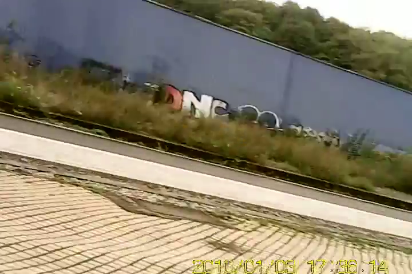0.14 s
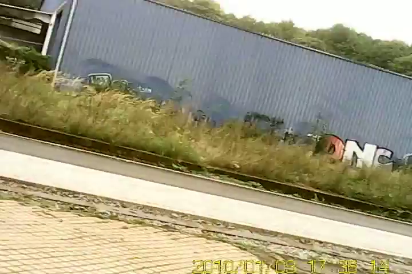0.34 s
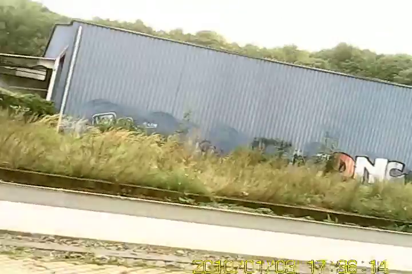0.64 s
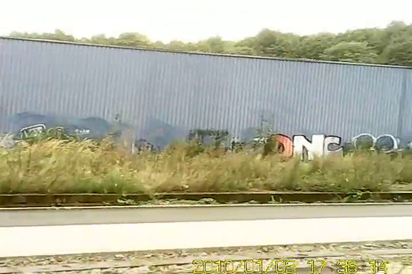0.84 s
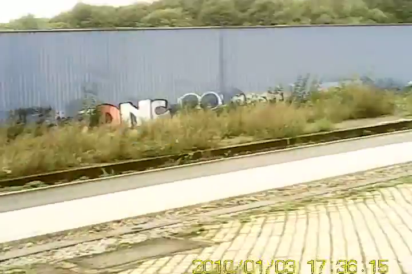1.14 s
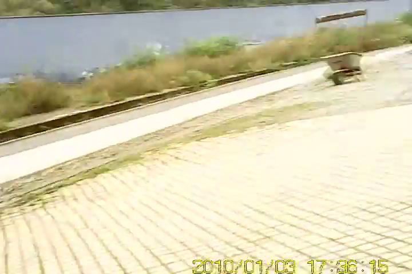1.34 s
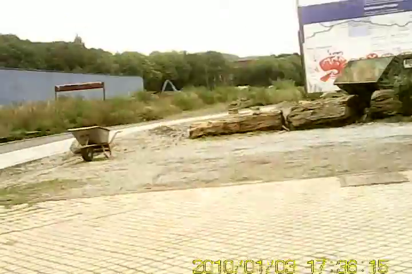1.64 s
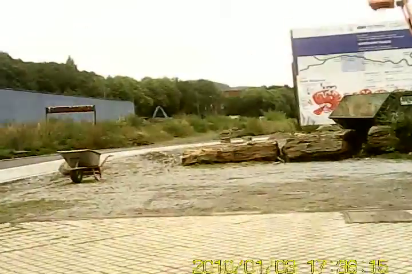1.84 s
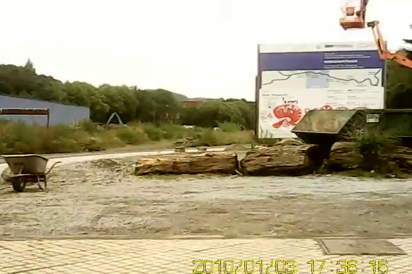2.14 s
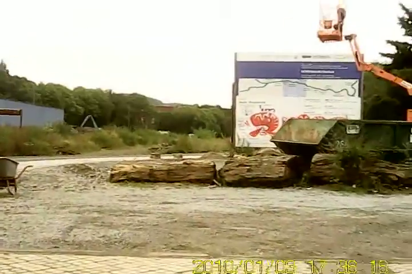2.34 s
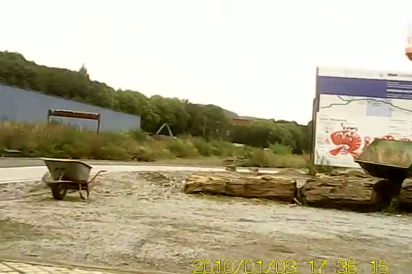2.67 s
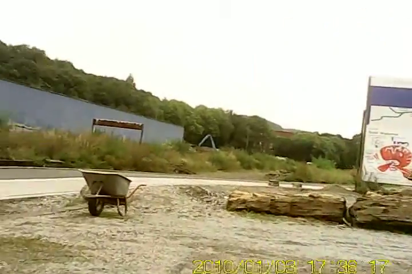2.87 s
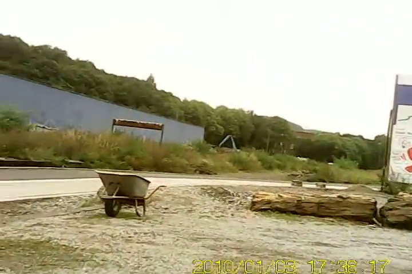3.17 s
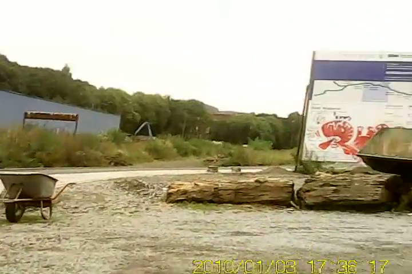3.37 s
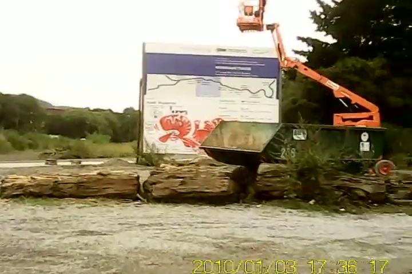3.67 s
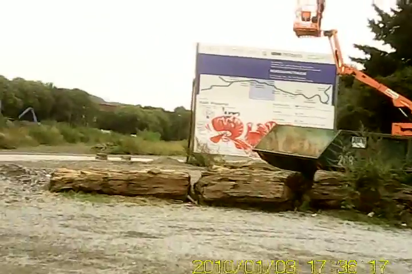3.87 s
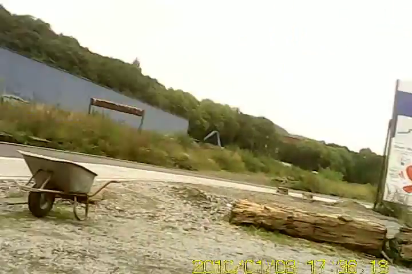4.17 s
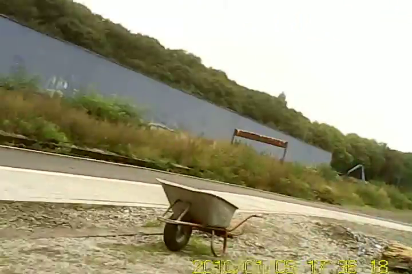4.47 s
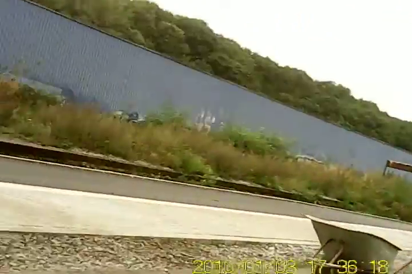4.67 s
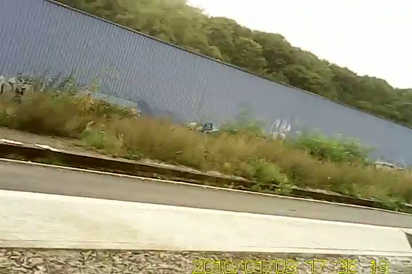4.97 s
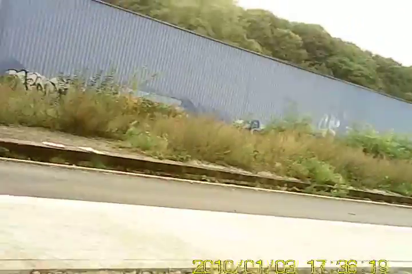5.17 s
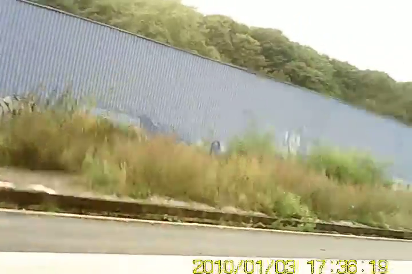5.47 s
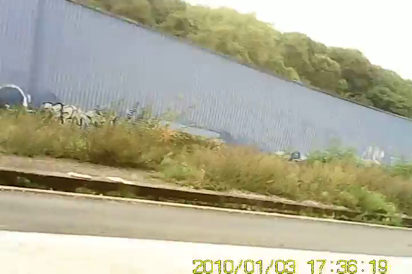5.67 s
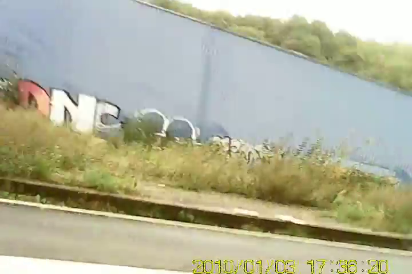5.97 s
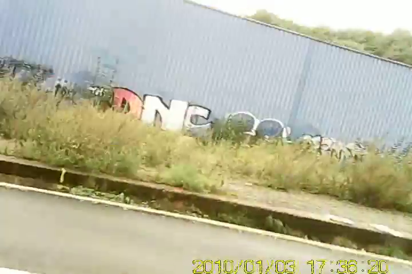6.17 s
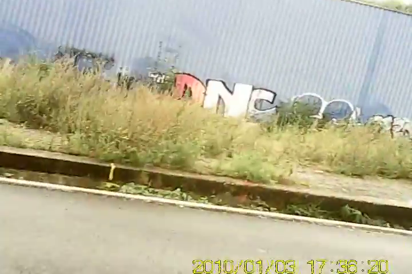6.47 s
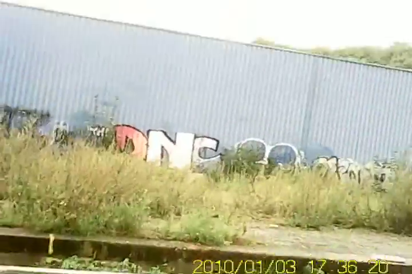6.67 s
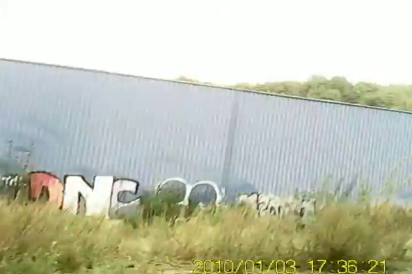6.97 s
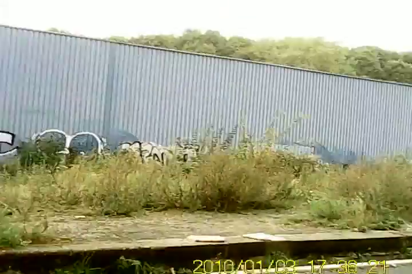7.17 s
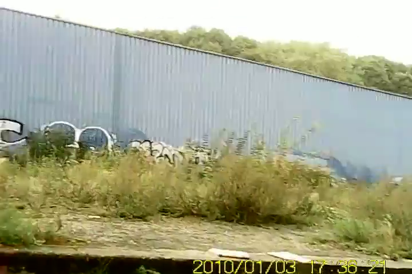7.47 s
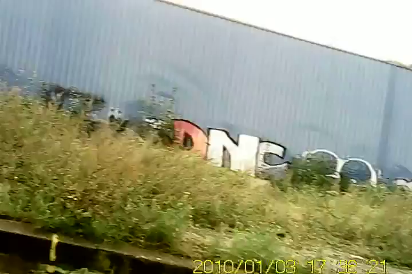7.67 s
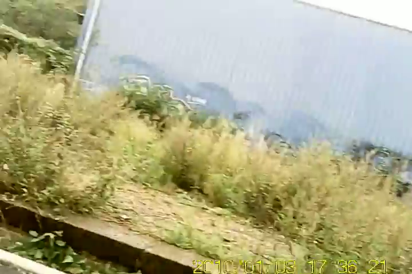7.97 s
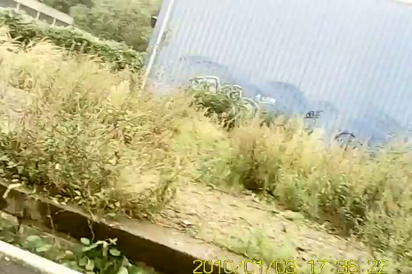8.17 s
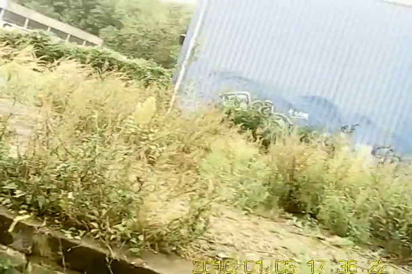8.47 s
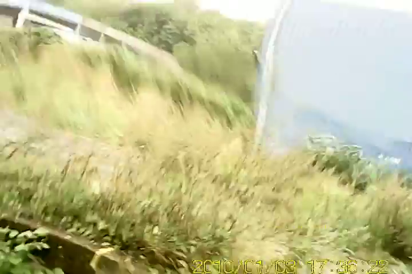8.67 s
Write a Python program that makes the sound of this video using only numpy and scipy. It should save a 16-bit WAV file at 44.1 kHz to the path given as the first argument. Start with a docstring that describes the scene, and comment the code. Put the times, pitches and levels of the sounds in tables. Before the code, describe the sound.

A bicycle rolls outdoors over uneven paving, gravel and a kerb, heard through a cheap microphone clamped to it: close, dry, boxy and badly clipped. A low, muffled midrange tyre rush runs throughout, with fine ticks and faint hiss. From 0 to 1.2 s sharp plastic clacks come in quick irregular groups; from 1.2 to 2.6 s they are lighter and sparser. A busy cluster of knocks with short metallic pings falls at 2.7-3.4 s, more at 3.7 s, then relative calm around 4-4.6 s. At about 5 s a longer buzzing rattle rings. From 5.45 to 7.3 s jolts merge into dense, violent chatter, with blunt overloaded pressure thumps around 6.4, 6.6 and 6.9 s. Separate knocks follow, a clear metallic ring at 7.65-7.75 s, harsh bursts at 8.0-8.3 s, a short lull, then hard rattling from 8.6 s to the end.

```python
"""Rattling camera on a bicycle

A small camera is clamped to a bicycle that rolls over paving, gravel and a kerb. Jolts make the mount chatter:
random contacts excite resonant modes of the case, and loose parts ring as decaying sines. Fine random ticks and
band-filtered noise for the tyre roar lie beneath. The converter rests just under its upper limit, so loud sounds
lose their upper half and crackle; a faint noise hiss is added."""
import sys
import numpy as np
from scipy import signal
from scipy.io import wavfile
from scipy.ndimage import uniform_filter1d

SR = 44100
rng = np.random.default_rng(int(sys.argv[2]) if len(sys.argv) > 2 else 0)


def pcm_store(signal):
    """Save signal as 16-bit PCM."""
    levels = np.round(np.clip(np.atleast_2d(signal), -1, 1) * 32767)
    wavfile.write(sys.argv[1], SR, levels.astype(np.int16).T)


N = 388962


def from_db(db):
    """Amplitude gain of a level in decibels."""
    return 10 ** (np.asarray(db) / 20)


def rms_one(x):
    """Signal scaled to rms 1."""
    return x / np.sqrt(np.mean(x ** 2) + 1e-20)


def drift(corner_hz):
    """Random modulation of rms 1: noise through a double one-pole low-pass."""
    pole = np.exp(-2 * np.pi * corner_hz / SR)
    noise = rng.standard_normal(N + SR)
    settled = signal.lfilter([1], [1, -2 * pole, pole * pole], noise)[SR:]
    return rms_one(settled)


def weak_jolts(tick_db):
    """Jolts at random moments, stronger on rougher ground; rows as for the strong jolts."""
    rate_per_s, mean_length_ms = 22, 6
    above_ticks_db, spread_db = 6, 3
    born = np.flatnonzero(rng.random(N) < rate_per_s / SR)
    length_ms = mean_length_ms * rng.exponential(1, N)[born]
    strength_db = (tick_db + above_ticks_db + spread_db * rng.standard_normal(N))[born]
    return list(zip(born / SR, length_ms, strength_db))


def chatter(weak):
    """A jolt is a first blow, then random contacts while the mount bounces; it also pumps the air in the case."""
    # strong jolts of the mount: (time [s], chatter length with last ring [ms], strength [dB])
    strong_jolts = [(.164, 2, -1), (.176, 15.7, -9), (0.226, 17.2, -9.5), (.348, 4.5, -10),
                    (.444, 4.13, -1.5), (0.455, 15, -16.5), (.478, 3.3, -16), (0.524, 2.2, 3),
                    (.534, 2.9, -3.5), (.557, 2.7, -4), (.57, 4.8, -8.5), (0.633, 4.7, -6),
                    (0.716, 1.1, -0.5), (0.858, 7.4, -13), (.88, 7.6, -11), (.924, 11.4, -24),
                    (.963, 12, -23), (1.019, 6.3, -4.5), (1.065, 2.2, -4.5), (1.099, 1.4, -12.5),
                    (1.131, 12.5, -5.5), (1.265, 2.2, -9.5), (1.408, 2.4, -14), (1.455, 2.7, -19),
                    (1.504, 1.2, -6.5), (1.586, 4.1, -20), (1.678, 7.1, -21.5), (1.703, 4.35, -5.5),
                    (1.759, 2.2, -10.5), (1.804, 2.7, -9), (1.812, 1.7, -11), (1.837, 3.9, -5.5),
                    (1.895, 4.6, -8), (1.954, 2.1, -7.5), (2.088, 1.7, -3.5), (2.109, 2.1, -15),
                    (2.214, 5.6, -19), (2.283, 2.7, -14.5), (2.639, 1.93, -11.5), (2.672, 2, -12),
                    (2.706, 3.1, -8), (2.736, 9.5, -19), (2.757, 9.3, -9), (2.774, 3.3, -2.5),
                    (2.8, 2.5, -10.5), (2.857, 3, -9.5), (2.898, 2.2, -2), (2.923, 8.7, -11.5),
                    (2.957, 3.6, -5), (2.972, 7.7, -13.5), (3.11, 2.43, 0), (3.118, 29, -8),
                    (3.157, 7, -2.5), (3.176, 1.4, -3), (3.189, 7.2, -7.5), (3.245, 2.7, -17.5),
                    (3.274, 1.74, -3.5), (3.289, 4.3, -11), (3.298, 3.3, -13), (3.367, 4.1, -15),
                    (3.42, 13.6, -21.5), (3.532, 3.7, -10), (3.546, 5.7, -18), (3.624, 5.6, -16),
                    (3.669, 2, -8.5), (3.678, 1.93, 1), (3.713, 2.2, -15), (3.779, 2.7, -9),
                    (3.924, 2.8, -9), (3.934, 6.1, -16), (3.973, 2.35, -10), (4.285, 4.16, -13),
                    (4.594, 3.4, -10.5), (4.616, 6.5, -16), (4.628, 9.6, -17.5), (4.637, 2.9, -8.5),
                    (4.677, 5.8, -11), (4.968, 46, -7.5), (4.694, 4.9, -15), (5.041, 6.6, -9.5),
                    (5.127, 1.8, -7.5), (5.214, 2.8, -8), (5.321, 2.4, -10.5), (5.331, 2.1, -5.5),
                    (5.341, 6.3, -15), (5.38, 4.2, -11), (5.396, 2.6, -8.5), (5.461, 2.5, -11),
                    (5.472, 4.8, -5), (5.487, 2.6, 1), (5.502, 25, -7.5), (5.552, 10.4, -10.5),
                    (5.628, 30, -9), (5.661, 15, -19), (5.685, 7.1, -8), (5.699, 15, -9), (5.726, 21, -8),
                    (5.776, 69, -29), (5.843, 19.7, -8.5), (5.875, 4.9, -11.5), (5.886, 7.9, -7),
                    (5.951, 3, -12), (5.962, 23, -10), (5.999, 32, -13.5), (6.032, 1.48, -0.5),
                    (6.05, 18.4, -8), (6.074, 4.4, -16), (6.105, 17, -13), (6.129, 2.55, -4.5),
                    (6.146, 6.5, -9.5), (6.16, 3.4, -8), (6.19, 9.9, -8.5), (6.202, 5.9, -7.5),
                    (6.217, 2.2, -3), (6.232, 21, -10.5), (6.284, 1.6, -14), (6.367, 2.6, -19),
                    (6.376, 35.5, -7), (6.416, 35.4, -5), (6.468, 28.5, -7), (6.503, 40.6, -9.5),
                    (6.564, 6.2, -11), (6.58, 52, -6), (6.636, 17, -7), (6.652, 17.6, -10),
                    (6.678, 15, -12), (6.709, 8.6, -6), (6.742, 2.9, -6.5), (6.754, 2.7, -9),
                    (6.773, 6.8, -9), (6.8, 10, -11), (6.841, 8.3, -6), (6.864, 30, -6.5),
                    (6.897, 41, -3.5), (6.944, 33, -8), (6.994, 6.1, -4), (7.006, 50, -6.5),
                    (7.051, 32.8, -7.5), (7.092, 30, -20.5), (7.127, 6.3, -5), (7.143, 18.7, -9),
                    (7.169, 40, -16.5), (7.202, 13.7, -5), (7.231, 4.4, -14), (7.278, 2.8, -6),
                    (7.283, 18, -20), (7.4, 5.1, -7), (7.427, 1.8, -5), (7.438, 17, -24), (7.461, 3.1, -14),
                    (7.481, 4.5, -8.5), (7.605, 3.2, -4), (7.63, 3.3, -18), (7.647, 15, -3),
                    (7.688, 2.9, -9), (7.726, 20.2, -6.5), (7.756, 19, -14), (7.814, 3.7, -13.5),
                    (7.893, 0.84, -5), (7.932, 1.86, -9), (7.96, 10, -11), (8.002, 2.6, -10),
                    (8.04, 46, -6), (8.1, 17, -6), (8.128, 1.7, -1), (8.149, 3.3, -16), (8.175, 41.5, -7.5),
                    (8.222, 18, -11), (8.247, 43, -8.5), (8.298, 9.3, -24), (8.621, 58, -9.5),
                    (8.689, 17, -3), (8.754, 20, -3), (8.79, 11.6, -11.5), (8.811, 9, -7)]
    first_blow_db = -7  # against the jolt
    last_ring_ms = 1.5
    bounce_hz, bounce_spread_db = 45, 2.5
    contacts_per_s, contact_spread_db = 1800, 2
    pump, pump_wobble, pump_wobble_hz = 0.4, 0.22, 326  # air pressure per unit of force

    force, blows = np.zeros(N), np.zeros(N)
    bounce_db = bounce_spread_db * drift(bounce_hz)
    for start_s, length_ms, strength_db in [*weak, *strong_jolts]:
        at = round(start_s * SR)
        bouncing_ms = max(length_ms - last_ring_ms, 0.)
        span = slice(at, at + round(bouncing_ms * SR / 1000) + 1)
        swell_db = bounce_db[span] - bounce_db[span].mean()
        force[span] = from_db(strength_db + swell_db)
        blows[at] = from_db(strength_db + first_blow_db)

    touching = rng.random(N) < contacts_per_s / SR
    contacts = touching * from_db(contact_spread_db * rng.standard_normal(N) - 4.5)
    smooth_force = uniform_filter1d(force, size=60)
    pumped = smooth_force * (pump + pump_wobble * drift(pump_wobble_hz))
    return force * contacts, blows, pumped, force


def case_rings(contacts, blows):
    """Contacts strike each mode with its own random strength and sign; a square blow starts all in step."""
    # modes of case and mount: (frequency [Hz], relative level [dB], t60 [s])
    modes = [(870, -33, 0.003), (1554, -10, 0.031), (1936, -5.5, 0.0069), (2258, 2, 0.0096),
             (2492, -3, 0.019), (2751, 2, 0.011), (2976, 3.5, 0.0087), (5160, 14, 0.0023)]
    strength_spread_db = 3
    out = np.zeros(N)
    for hz, level_db, t60_s in modes:
        pole = from_db(-60 / (t60_s * SR))
        w = 2 * np.pi * hz / SR
        strength = from_db(level_db + strength_spread_db * rng.standard_normal(N))
        struck = strength * contacts * rng.choice([-1, 1], N) - from_db(level_db) * blows
        out += signal.lfilter([0, np.sin(w)], [1, -2 * pole * np.cos(w), pole * pole], struck + 1e-18)
    return out


def faint_pings(tick_db):
    """Faint rings around one pitch at random moments, stronger on rougher ground; rows as for the clear rings."""
    rate_per_s, centre_hz, spread_hz = 14, 2363, 90
    above_ticks_db, spread_db = 12, 3
    born = np.flatnonzero(rng.random(N) < rate_per_s / SR)
    hz = centre_hz + spread_hz * rng.standard_normal(N)[born]
    level_db = (tick_db + above_ticks_db + spread_db * rng.standard_normal(N))[born]
    return list(zip(born / SR, hz, level_db))


def pings(faint):
    """A shaken metal part swells for a few cycles and rings out on one pitch with a rough buzz."""
    # clear rings of loose parts: (time [s], pitch [Hz], peak level before roughness [dB])
    clear_rings = [(0.227, 2600, -3), (0.232, 1552, -5.5), (0.92, 2185, -5), (1.131, 2967, -5),
                   (1.135, 1484, -6.5), (1.501, 2203, -4), (3.121, 1504, -2.5), (3.163, 1544, -6.5),
                   (3.241, 2410, -7), (3.921, 2195, -5.5), (4.963, 2730, -2), (4.97, 1527, -7),
                   (4.999, 2450, -5), (5.007, 1510, -9), (5.555, 1510, -7.5), (5.7, 1674, -3),
                   (5.731, 1617, -2), (6.05, 2970, -1), (6.144, 2270, -3.5), (7.043, 1528, -2),
                   (7.065, 1560, -7), (7.155, 2630, -10), (7.6, 2350, -7), (7.654, 1526, 1.5),
                   (7.728, 1486, -8), (7.732, 2300, 2), (7.755, 2930, -4), (7.958, 2314, -6),
                   (8.108, 2740, -8)]
    rise_s, t60_at_1500hz_s = 0.0023, 0.052
    rough_db, rough_hz = 3, 230
    out = np.zeros(N)
    t = np.arange(round(.08 * SR)) / SR
    phases = rng.uniform(0, 2 * np.pi, 1000)
    for (start_s, hz, peak_db), phase in zip([*clear_rings, *faint], phases):
        at = round(start_s * SR)
        decay = from_db(-60 * t / t60_at_1500hz_s * (hz / 1500) ** 1.6)  # higher rings die sooner
        shape = (1 - np.exp(-t / rise_s)) * decay
        ring = from_db(peak_db) * shape / shape.max() * np.sin(2 * np.pi * hz * t + phase)
        out[at:at + len(t)] += ring[:N - at]
    return out * from_db(rough_db * drift(rough_hz))


def shoves():
    """Each shove is one rounded push of pressure on the diaphragm, strong enough to pin the converter."""
    # pressure shoves: (time [s], length [ms])
    pushes = [(6.387, 8.2), (6.398, 7.7), (6.585, 4), (6.595, 5.2), (6.614, 4.8), (6.847, 9.9),
              (6.861, 2.2), (6.888, 5.5), (6.924, 4.6), (6.935, 5), (7.001, 5.1), (8.091, 9.1), (8.272, 6)]
    out = np.zeros(N)
    for start_s, length_ms in pushes:
        at, size = round(start_s * SR), round(length_ms * SR / 1000)
        out[at:at + size] += from_db(12) * np.sin(np.pi * np.arange(size) / size) ** 0.086
    return out


def ticking(tick_db):
    """Small uneven contacts in loose clusters, most faint, a few sharp."""
    base_per_s = 250  # before clustering
    clustering = from_db(6 * drift(20) - 1.5)
    born = rng.random(N) < base_per_s * clustering / SR
    sizes = from_db(tick_db - 3.5 + 2.1 * np.minimum(rng.exponential(1, N), 3))
    return born * sizes


def tyre_roar(roar_db, patchy_db):
    """Third-octave bands of noise that flutter partly together with the bumps of the ground."""
    # roar spectrum: (frequency [Hz], relative density [dB per Hz])
    spectrum = np.array([(40, -22), (200, -14), (450, -14.5), (800, -9), (1150, -7.5), (1700, -9),
                         (2400, -10), (3100, -31), (3600, -33.5), (7000, -34)])
    out = 0
    together = drift(20)
    edges_hz = 35 * 2 ** np.arange(0, 8, 1 / 3)
    white = rng.standard_normal((2, N))
    flutter = [drift(3.1), drift(28), drift(36)]  # dealt to the bands in turn
    for k, (low_hz, high_hz) in enumerate(zip(edges_hz, edges_hz[1:])):
        band_pass = signal.butter(2, [low_hz, high_hz], "band", fs=SR, output="sos")
        band = signal.sosfilt(band_pass, white[k % 2])
        log_centre = np.log(low_hz * high_hz) / 2
        level_db = np.interp(log_centre, np.log(spectrum[:, 0]), spectrum[:, 1])
        flutter_db = patchy_db * (2.0 * together + 1.0 * flutter[k % 3])
        out = out + band * from_db(level_db + flutter_db)
    return from_db(roar_db + 1) * rms_one(out)


def scene():
    """Rattle dulled by the microphone port, plus tyre roar and pressure shoves."""
    # rolling: (time [s], relative tyre roar level [dB], ground roughness as relative ticking level [dB])
    rolling = [(0.0, -28, -29.5), (0.4, -28.5, -41), (1.0, -28, -28.5), (1.5, -26.5, -39),
               (1.9, -26.5, -31.5), (2.45, -28, -34.5), (2.9, -27.5, -32.5), (3.7, -28.5, -30),
               (4.1, -29, -35.5), (4.47, -30, -35), (4.69, -28.5, -29), (5.2, -29, -34),
               (5.55, -28.5, -23.5), (7.1, -37.5, -22.5), (7.35, -27, -32.5), (8.2, -33, -22),
               (8.402, -30.5, -36.5), (8.82, -29, -27)]
    linger_s, linger_db = 0.016, -5.5  # ticking swells after a jolt and dies away; level against the jolt
    port_hz = 3360

    time_s, *columns = np.transpose(rolling)
    roar_db, tick_db = [np.interp(np.arange(N) / SR, time_s, c) for c in columns]
    contacts, blows, pumped, force = chatter(weak_jolts(tick_db))

    pole = np.exp(-1 / (linger_s * SR))
    lingering = signal.lfilter([1 - pole], [1, -pole], force + 1e-18)
    shaken = from_db(tick_db) + from_db(linger_db) * lingering
    ticks = ticking(20 * np.log10(shaken))

    rattle = case_rings(ticks + contacts, blows) + pumped + pings(faint_pings(tick_db))
    rattle = signal.sosfilt(signal.butter(3, port_hz, fs=SR, output="sos"), rattle)
    return (tyre_roar(roar_db, patchy_db=0.5) + rattle + shoves())[None]


def record(dry):
    """A slow converter rests off-centre and limits hard; playback at the full rate overshoots and is limited again."""
    rest, limit = .657, .707  # offset and first limit, full scale = 1
    headroom = 0.0024  # second limit above the first
    converter_hz, edge_hz, cutoff_hz = 16000, 18340, 15700
    hiss_db = -66  # before the last low-pass

    t = np.arange(N) / SR
    slow_t = np.arange(round(N * converter_hz / SR) + 1) / converter_hz
    held = np.clip(rest + np.interp(slow_t, t, dry[0]), -limit, limit) - rest
    played = signal.resample_poly(held, SR, converter_hz)[:N]
    smooth = signal.sosfiltfilt(signal.butter(3, edge_hz, fs=SR, output="sos"), played)
    limited = np.clip(rest + smooth, -limit - headroom, limit + headroom) - rest
    hissing = limited + from_db(hiss_db) * rng.standard_normal(N)
    low_pass = signal.ellip(8, .3, 55, cutoff_hz, fs=SR, output="sos")
    return rest + signal.sosfilt(low_pass, hissing)[None]


dry = scene()
out = record(dry)
pcm_store(out)
```